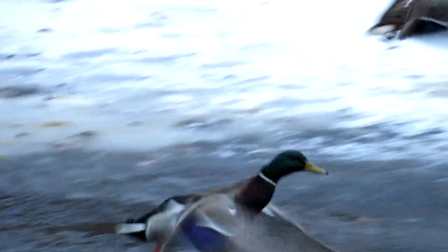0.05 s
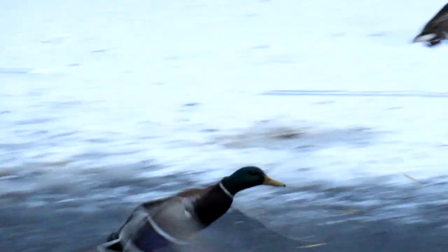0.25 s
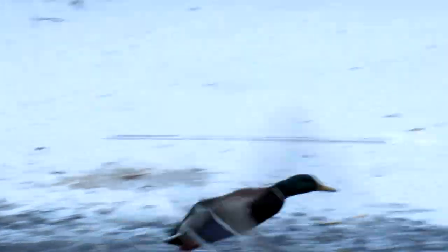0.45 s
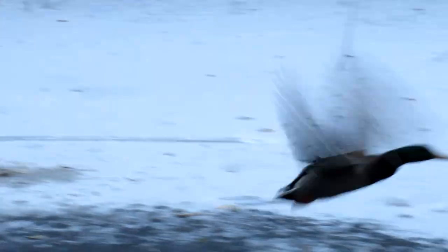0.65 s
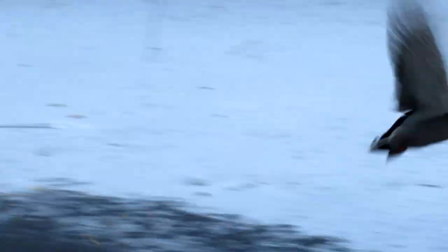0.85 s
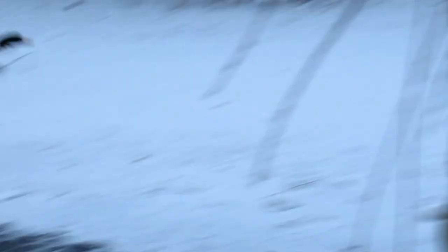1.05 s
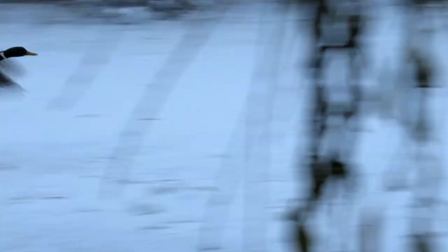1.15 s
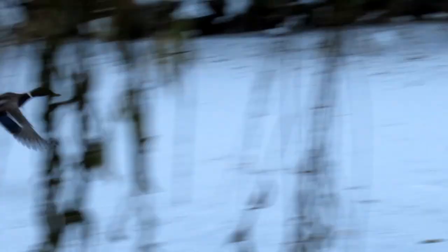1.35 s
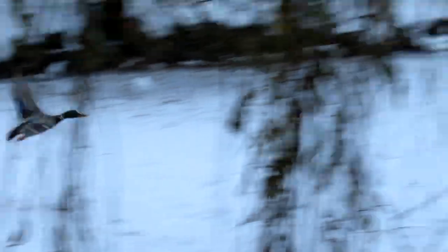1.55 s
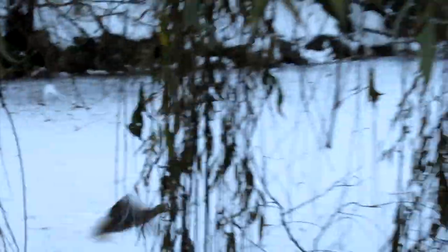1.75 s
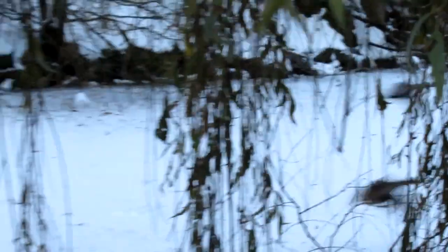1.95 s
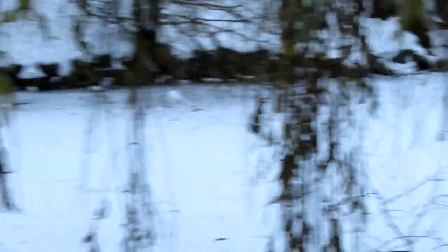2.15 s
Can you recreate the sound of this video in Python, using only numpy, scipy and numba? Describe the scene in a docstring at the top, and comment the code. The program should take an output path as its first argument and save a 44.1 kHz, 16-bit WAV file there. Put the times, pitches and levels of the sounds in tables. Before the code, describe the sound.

Fast whistling wingbeats and small ticks on ice come first, then three rough duck quacks half a second apart, with a dull knock between the first two; open park, soft distant engine hum, faint echo.

```python
"""On a frozen pond in a park in town mallards take off, and one gives three harsh quacks.
Uneven pulses of the syrinx ring its throat and bill; wings whistle and swish on each stroke, with low flaps of air.
Feet tick on the ice as short bursts of ringing noise; a dull knock and its weaker rebound ring damped modes.
Behind lie a low engine hum, a faint high whine and the wash of the park as shaped noise, and a weak echo."""
import sys
import numpy as np
from scipy import signal
from scipy.fft import rfft, irfft
from scipy.io import wavfile
from scipy.ndimage import uniform_filter1d
from numba import njit

SR = 44100
rng = np.random.default_rng(int(sys.argv[2]) if len(sys.argv) > 2 else 0)


def wrap_up_sound(samples):
    """Save the sound to the file named by the first command line argument, as 16-bit audio."""
    columns = np.atleast_2d(samples).T
    # keep every value between -1 and 1, then stretch to whole-number steps
    tamed = np.clip(columns, -1, 1)
    steps = np.round(tamed * 32767).astype(np.int16)
    wavfile.write(sys.argv[1], SR, steps)


N = 97020
T = np.arange(N) / SR  # time [s]


def undb(db):
    """Decibels to gain."""
    return 10 ** (np.asarray(db) / 20)


def unit(x):
    """Scale to rms 1."""
    return x / np.sqrt(np.mean(x ** 2) + 1e-20)


def curve(rows, t=T):
    """Straight lines through (time [s], value) points."""
    return np.interp(t, *np.array(rows, float).T)


def bell(age, width):
    """A smooth swell around age 0, both in seconds."""
    return np.exp(-.5 * (age / width) ** 2)


def walk(rate, size=N):
    """Smooth random wander with rms 1, from random steps at a rate per second."""
    k = max(int(SR / rate), 1)
    steps = np.repeat(rng.standard_normal(size // k + 1), k)
    smooth = uniform_filter1d(uniform_filter1d(steps, k), k)
    return unit(smooth[:size])


def noise(points):
    """Noise of rms 1 with a spectrum through (frequency [Hz], relative density [dB per Hz]) points."""
    hz, db = np.array(points, float).T
    f = np.maximum(np.arange(N // 2 + 1) * SR / N, 1)
    gain = undb(np.interp(np.log(f), np.log(hz), db))
    return unit(irfft(rfft(rng.standard_normal(N)) * gain, N))


@njit
def svf(x, hz, width):
    """A state-variable band-pass with a moving centre and gain 1 there."""
    y, band, low = np.empty(len(x)), 0., 0.
    for i in range(len(x)):
        g, k = np.tan(np.pi * hz[i] / SR), width / hz[i]
        v = (band + g * (x[i] - low)) / (1 + g * (g + k))
        band, low, y[i] = 2 * v - band, low + 2 * g * v, k * v
    return y


def ring(x, hz, width):
    """A steep resonance: the band-pass applied twice, with the width [Hz] of one pass."""
    hz = np.clip(hz + np.zeros(len(x)), 20, SR * .45)
    once = svf(x, hz, float(width))
    return svf(once, hz, float(width))


def ringing_noise(hz, width):
    """White noise through a resonance, rms 1."""
    return unit(ring(rng.standard_normal(N), hz, width))


def engine_hum():
    """A distant engine hums: harmonics of one low, slightly wavering pitch."""
    hum_hz, waver = 75.5, .0045  # waver: rms share of the pitch
    # harmonics: (multiple of the pitch, relative level [dB])
    hum_lines = [(1, -0.5), (2, -10.5), (3, -21), (4, -14.5)]
    # loudness of the hum: (time [s], level [dB])
    hum_level = [(0, -47), (.2, -37), (.65, -35.5), (1.1, -35.5), (1.4, -34), (1.65, -36.5), (1.75, -42.5),
                 (2.2, -42.5)]
    phase = 2 * np.pi * np.cumsum(hum_hz * (1 + waver * walk(12))) / SR
    hum = np.zeros(N)
    for multiple, db in hum_lines:
        strength = undb(db + 1.1 * walk(14))
        hum += strength * np.sqrt(2) * np.sin(round(multiple) * phase)
    return hum * undb(curve(hum_level))


def park_wash():
    """The wide wash of the park: shaped noise whose level wanders slightly."""
    # colour of the wash: (frequency [Hz], relative density [dB per Hz])
    park_colour = [(20, -12), (45, -6.5), (90, 4), (130, -3), (220, -2.5), (450, -6.5), (900, -8.5),
                   (1800, -14.5), (3000, -19.5), (4500, -25.5), (5800, -27), (10000, -31.5), (15000, -33)]
    # mean loudness of the wash: (time [s], level [dB])
    park_level = [(0, -37), (.2, -35), (1.3, -34.5), (1.7, -35), (2.2, -34.5)]
    return noise(park_colour) * undb(curve(park_level) + walk(24.66))


def whine():
    """A faint high whine: a steady narrow band of noise."""
    whine_hz, width_hz, level_db = 4450, 220, -52.5
    return undb(level_db) * ringing_noise(whine_hz, width_hz)


WHISTLE_S = .014  # bell width of each whistle [s]


def feather(age, hz, multiple=1):
    """Air sets a feather whistling: narrow noise on a pitch arch that rises through the stroke."""
    rise, arch, width_hz = 10000, 370000, 285  # [Hz/s], [Hz/s^2], [Hz], all times the multiple
    near = np.clip(age, -2 * WHISTLE_S, 2 * WHISTLE_S)
    pitch = hz + rise * near - arch * near ** 2
    return ringing_noise(multiple * pitch, multiple * width_hz) * bell(age, WHISTLE_S)


def wings():
    """On each stroke the flight feathers whistle and the air swishes with a fine rustle."""
    # wing strokes: (time [s], whistle pitch [Hz], whistle level [dB], swish level [dB])
    strokes = [(0.057, 4270, -65, -42), (0.208, 4690, -50.5, -45.5), (0.322, 4950, -43.5, -45),
               (0.415, 4900, -44.5, -46), (0.523, 4820, -45, -44.5), (.628, 4920, -45, -52),
               (0.735, 4780, -42, -51), (.838, 4730, -43, -46.5), (0.942, 4880, -44.5, -48),
               (1.05, 4660, -45, -51.5), (1.156, 4790, -47, -54), (1.263, 4700, -46.5, -54),
               (1.37, 4700, -59, -44.5), (1.475, 4750, -50.5, -49), (1.584, 4900, -52, -52),
               (1.697, 4480, -49.5, -62), (1.80, 4950, -70, -79), (2.029, 4720, -49, -54),
               (2.149, 4640, -48.5, -60)]
    # feather tones: (multiple of the whistle pitch, level against the whistle [dB])
    feather_tones = [(0.792, -4), (0.998, 4), (2, -9)]
    # thin whistles from the wings of other ducks: (time [s], pitch [Hz], level [dB])
    far_whistles = [(0.065, 3470, -45.5), (.085, 6020, -46), (1.127, 5550, -53), (1.692, 5670, -46.5)]
    # colour of the swish: (frequency [Hz], relative density [dB per Hz])
    swish_colour = [(200, 13), (700, -50.5), (1500, 1.5), (3500, 4.5), (6000, 0), (9500, 2.5), (15000, -8)]
    # a stiffer feather: pitch ratio, how much earlier it sounds [s], level against the whistle [dB]
    upper_ratio, upper_lead_s, upper_db = 1.06, .0077, -4.5
    swish_width_s = .042

    times, hz, whistle_db, swish_db = np.array(strokes, float).T
    stroke = np.argmin(abs(T - times[:, None]), axis=0)  # the nearest stroke at each moment
    age = T - times[stroke]
    tones = sum(undb(db) * feather(age, hz[stroke], multiple) for multiple, db in feather_tones)
    tones += undb(upper_db) * feather(age + upper_lead_s, upper_ratio * hz[stroke])
    others = sum(undb(db) * feather(T - start, pitch) for start, pitch, db in far_whistles)
    swell = sum(undb(db) * bell(T - time, swish_width_s) for time, db in zip(times, swish_db))
    rustle = undb(3.44 * walk(400))
    return tones * undb(whistle_db[stroke]) + others + swell * noise(swish_colour) * rustle


def flaps():
    """Low puffs of air pushed by the wings as they beat close to the ice."""
    # flaps: (time [s], centre [Hz], level [dB], bell width [s])
    flap_rows = [(0.167, 188, -33.5, 0.014), (.255, 454, -34.5, 0.014), (0.482, 950, -40.5, .012),
                 (0.686, 162, -32.5, 0.01)]
    out = np.zeros(N)
    for time, hz, db, width in flap_rows:
        out += undb(db) * ringing_noise(hz, hz * 1.16) * bell(T - time, width)
    return out


def ticks():
    """Feet scratch the ice: short bursts of ringing noise that start at once and die away."""
    # ticks: (time [s], starting level [dB], ring [Hz], decay to 1/e [s])
    tick_rows = [(0.2237, -25, 2800, 0.0016), (0.331, -34.5, 6500, 0.0037), (0.4516, -25, 2650, 0.0024),
                 (0.6, -37.5, 7540, 0.003), (1.004, -34, 1900, 0.0083), (1.0454, -29, 2320, 0.0024)]
    out = np.zeros(N)
    for time, db, hz, decay in tick_rows:
        fade = (T >= time) * np.exp(-abs(T - time) / decay)
        out += undb(db) * ringing_noise(hz, hz * .82) * fade
    return out


def syrinx(cycles, jitter, scatter_db, rasp):
    """The syrinx gives pulses of uneven spacing and size, each with a puff of rasping air."""
    rasp_decay_cycles = .3
    chance = rng.standard_normal((128, 2))
    hiss = rng.standard_normal(len(cycles))
    starts = np.cumsum(np.maximum(1 + jitter * chance[:, 0], .5)) - 1
    sizes = undb(scatter_db * chance[:, 1])
    index = np.arange(len(cycles))
    source = np.zeros(len(cycles))
    for start, size in zip(starts, sizes):
        if 0 < start < cycles[-1]:
            lag = index - np.interp(start, cycles, index)
            pulse = np.sinc(lag) * np.exp(-(lag / 10) ** 2)  # a click placed between samples
            fade = (cycles > start) * np.exp(-abs(cycles - start) / rasp_decay_cycles)
            source += size * (pulse + rasp * hiss * fade / 2)
    return source


def quack(pitch, effort, jitter, scatter_db, rasp, overtone_db):
    """Syrinx pulses ring throat, chest and bill while the bill opens; effort sets the loudness."""
    # main throat resonances: (centre [Hz], width of one pass [Hz], mid-quack relative level [dB])
    throat = [(1560, 253, -1.5), (1756, 154, 2), (2033, 350, -1), (2250, 272, 3.5), (2616, 310, -9)]
    # weak chest resonances: (centre [Hz], width of one pass [Hz], relative level [dB])
    chest = [(296, 160, -14.5), (650, 1100, -14.5)]
    # bill overtones: (centre [Hz], width of one pass [Hz], level before overtone and opening gains [dB])
    bill = [(3590, 260, -15), (4350, 900, -20), (6040, 630, -23), (8160, 730, -30)]
    bill_opens = .039  # share by which throat and bill resonances rise through a quack
    brighten_db = 4.5  # gain of all but the lowest throat resonance and of the bill, start to end

    span = (T >= effort[0][0]) & (T < effort[-1][0])
    t = T[span]
    cycles = np.cumsum(curve(pitch, t)) / SR
    source = syrinx(cycles, jitter, scatter_db, rasp)
    opening = np.linspace(-.5, .5, len(t))
    shift = 1 + bill_opens * opening
    voice = np.zeros(len(t))
    for k, (hz, width, db) in enumerate(throat):
        gain = undb(db + brighten_db * opening * (k > 0))
        voice += (-1) ** k * gain * ring(source, hz * shift, width)  # neighbours in opposite sign
    for hz, width, db in chest:
        voice += undb(db) * ring(source, hz, width)
    for hz, width, db in bill:
        gain = undb(db + overtone_db + brighten_db * opening)
        voice += gain * ring(source, hz * shift, width)
    strength = np.sqrt(uniform_filter1d(voice ** 2, size=700) + 1e-12)  # running rms over 16 ms
    out = np.zeros(N)
    out[span] = voice / strength * undb(curve(effort, t))
    return out


def duck():
    """One duck gives three quacks, each with its own pitch, effort and roughness."""
    # pitch of the voice, one list per quack: (time [s], pitch [Hz])
    pitches = [
        [(.735, 185.8), (.757, 222.9), (.772, 286), (.79, 289.2), (.812, 279), (.825, 255), (.84, 315.5),
         (.89, 339.5)],
        [(1.25, 180.4), (1.288, 261.6), (1.305, 284.2), (1.33, 308.5), (1.35, 290.8), (1.37, 278.8),
         (1.385, 346.2), (1.40, 335), (1.425, 297)],
        [(1.75, 206.6), (1.80, 236), (1.82, 334), (1.835, 296.2), (1.85, 355.3), (1.875, 311.7), (1.90, 281.7),
         (1.95, 301.5)],
    ]
    # loudness of the voice, one list per quack: (time [s], level [dB])
    efforts = [
        [(.735, -44), (.75, -31), (.77, -26), (.785, -18), (.803, -21.5), (.82, -25), (.84, -21), (.856, -16),
         (.868, -27.5), (.88, -36)],
        [(1.258, -47), (1.284, -23.5), (1.297, -21.5), (1.304, -20.5), (1.326, -14.5), (1.335, -22.5),
         (1.35, -17), (1.371, -20), (1.385, -15), (1.422, -16.5), (1.43, -20.5), (1.445, -45)],
        [(1.752, -52), (1.768, -31), (1.79, -25.5), (1.81, -23), (1.85, -17), (1.89, -20.5), (1.92, -20),
         (1.94, -22), (1.953, -33)],
    ]
    # one row per quack: (period scatter [share], pulse size scatter [dB],
    # rasp depth [twice the hiss gain], overtone gain [dB])
    roughness = [(.019, 2.7, 0.1, -1), (.026, 1.6, 0.18, 0), (.06, 2.5, .13, 0)]
    return sum(quack(p, e, *rough) for p, e, rough in zip(pitches, efforts, roughness))


def knocks():
    """A dull knock and its rebound ring a few damped modes; the contact is soft and there is little bass."""
    # knocks: (time [s], level before the band filter [dB], gain of the upper modes [dB])
    knock_rows = [(1.0476, -9, -2), (1.069, -26, 7.5)]
    # damped modes: (frequency [Hz], relative level before the band filter [dB], decay by 60 dB [s])
    modes = [(432, -0.5, 0.017), (726, 2.5, 0.0051), (1130, -4, 0.0043)]
    low_hz, soft_hz = 294, 1400  # edges of the band filter
    out = np.zeros(N)
    for time, db, bright_db in knock_rows:
        age = np.maximum(T - time, 0)
        for k, (hz, mode_db, t60) in enumerate(modes):
            gain = undb(db + mode_db + bright_db * (k > 0))
            out -= gain * np.sin(2 * np.pi * hz * age) * np.exp(-np.log(1000) * age / t60)
    band = signal.butter(2, [low_hz, soft_hz], "band", fs=SR, output="sos")
    return signal.sosfilt(band, out)


def banks(x):
    """A weak diffuse echo from banks and trees: a decaying noise tail after a short delay."""
    t60_s, level_db, delay_s = .55, -19, .025
    tail = rng.standard_normal(N) * (T > delay_s) * np.exp(-np.log(1000) * T / t60_s)
    tail /= np.sqrt(np.sum(tail ** 2))
    return undb(level_db) * signal.fftconvolve(x, tail)[:N]


def scene():
    """The ducks near the microphone, their echo and the distant background, in mono."""
    background = engine_hum() + park_wash() + whine()
    near = wings() + flaps() + ticks() + duck() + knocks()
    return (near + banks(near) + background)[None]


def record(dry):
    """The recorder cuts the top with a steep low-pass."""
    top_hz = 15140
    lowpass = signal.ellip(12, .2, 90, top_hz, fs=SR, output="sos")  # ripple and stop-band depth [dB]
    return signal.sosfilt(lowpass, dry)


dry = scene()
out = record(dry)
wrap_up_sound(out)
```